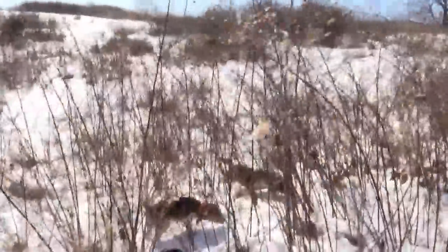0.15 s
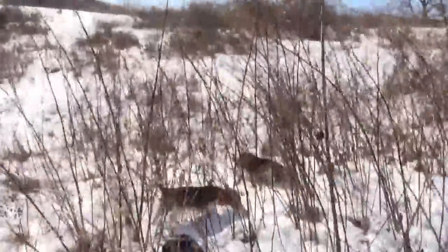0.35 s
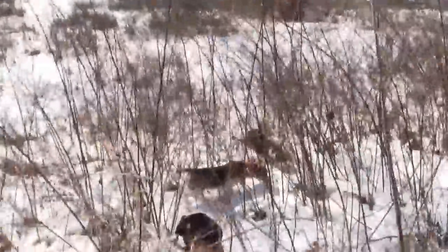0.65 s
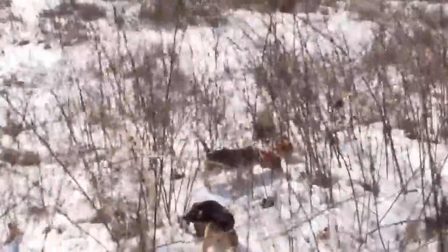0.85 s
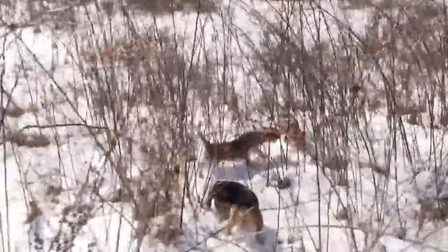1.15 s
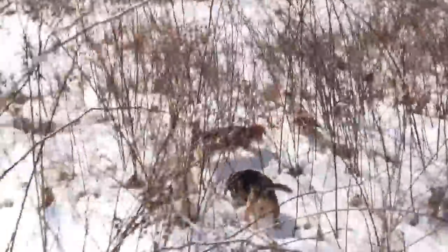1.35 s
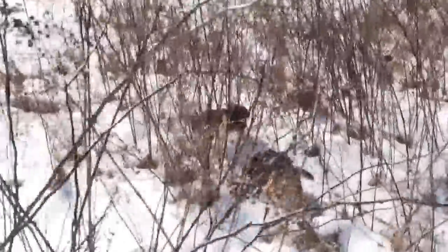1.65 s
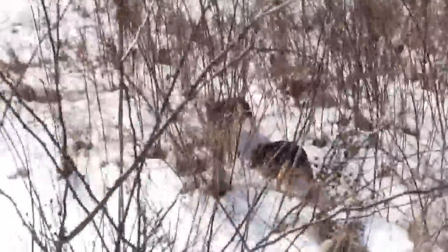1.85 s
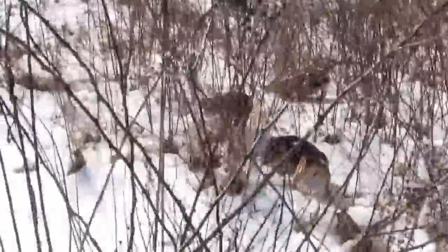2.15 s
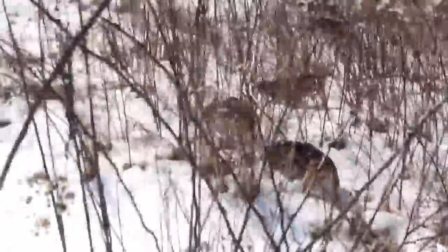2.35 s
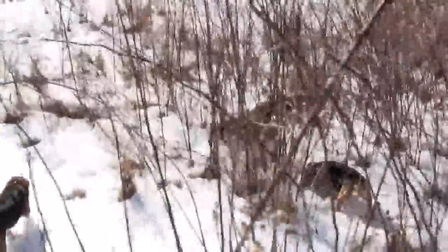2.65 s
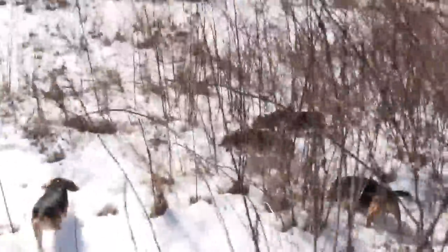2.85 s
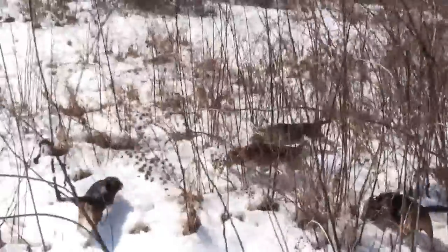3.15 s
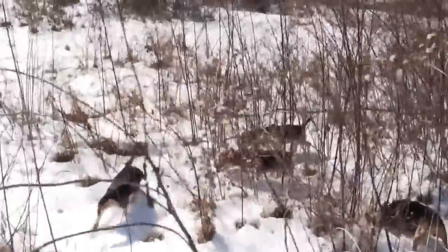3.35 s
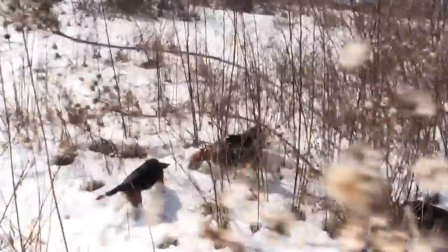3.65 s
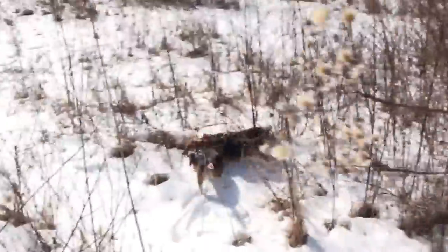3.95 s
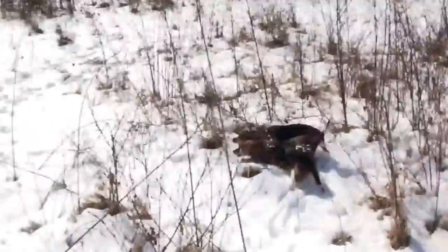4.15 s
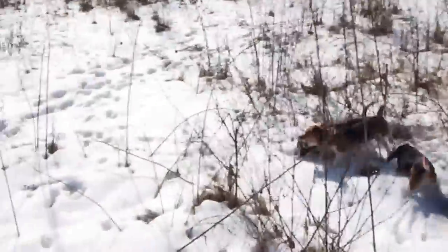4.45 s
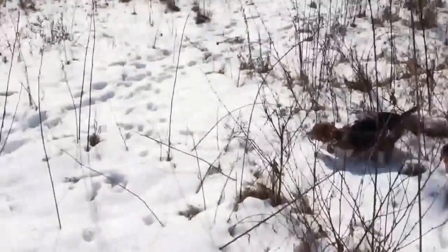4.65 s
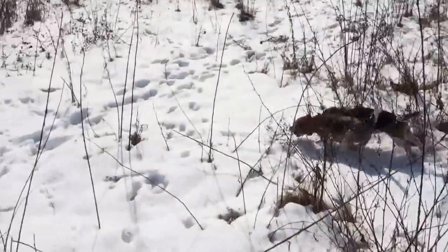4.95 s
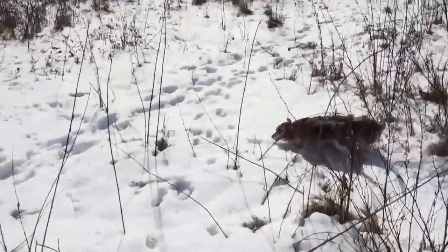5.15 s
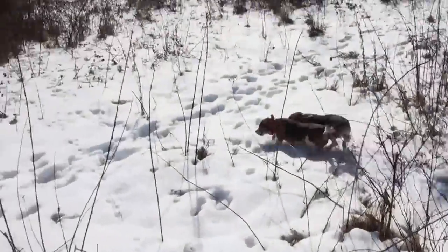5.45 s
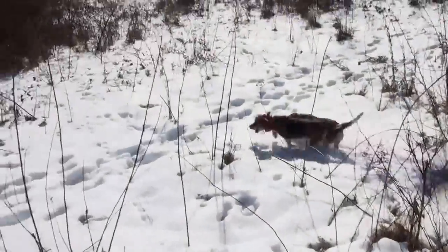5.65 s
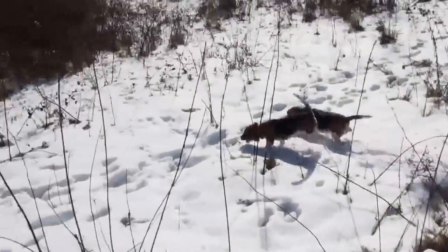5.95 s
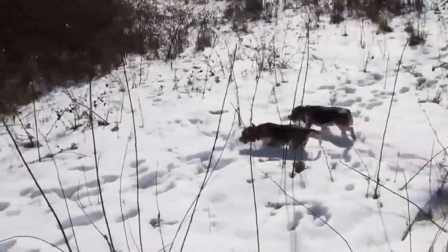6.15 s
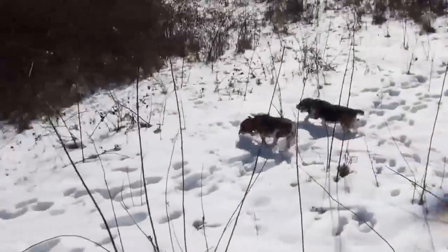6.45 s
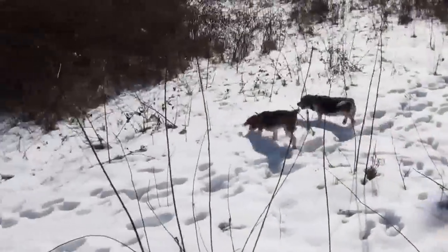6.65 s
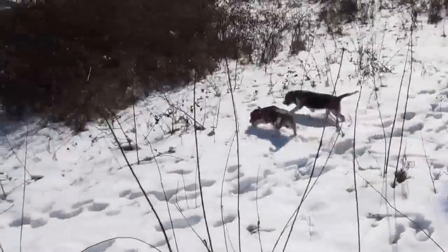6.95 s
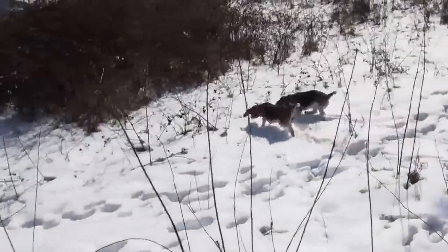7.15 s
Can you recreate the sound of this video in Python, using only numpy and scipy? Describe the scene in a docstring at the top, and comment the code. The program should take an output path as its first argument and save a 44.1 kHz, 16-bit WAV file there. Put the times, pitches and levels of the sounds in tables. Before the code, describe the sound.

Three hounds give tongue close to a handheld stereo microphone in open, nearly echoless snow. First only gusty rumble and crackling brush, then scattered bays with yelping voice breaks and gaps between them, then denser, rougher, overlapping cries. A soft low thud and small twig snaps slip in late, and the pack shifts gradually to the right.

```python
"""Wind rumbles on the microphone (shaped noise with gusts) while dry stems brush past (hiss and tiny cracks).
Twigs snap now and then (ringing noise bursts). After a second three hounds start to bay close by: one howls
long notes, then thin yelps break in (sliding tones), then come short chops and hoarse squalls, overlapping.
The baying voices are harmonics of vocal folds, roughened by a second oscillator and coloured by a throat.
One soft thud (a decaying sine) falls late in the scene, and the pack drifts to the right throughout."""
import sys
import numpy as np
from scipy import signal
from scipy.fft import rfft, irfft
from scipy.io import wavfile
from scipy.ndimage import uniform_filter1d, minimum_filter1d

SR = 44100
rng = np.random.default_rng(int(sys.argv[2]) if len(sys.argv) > 2 else 0)


def materialize(psi):
    """Save the field psi as 16-bit PCM at rate SR to the path in sys.argv[1].

    A 1-D psi becomes a single channel; in a 2-D psi each row is a channel.
    """
    bounded = np.clip(np.atleast_2d(psi).T, -1, 1)
    quanta = np.round(bounded * 32767).astype(np.int16)
    wavfile.write(sys.argv[1], SR, quanta)


N = 322371

# wind loudness over time, before gusts: t/s, relative level/dB
WIND_LEVEL = [(0, -38.5), (.65, -40.5), (.85, -32), (1.05, -31.5), (1.35, -45.5), (2.8, -43), (3.15, -51.5),
              (3.7, -45), (4.5, -36.5), (4.7, -59), (5.15, -54.5), (5.4, -65.5), (6.1, -55), (6.28, -44.5),
              (6.7, -54), (7.05, -59.5)]
# wind spectrum: f/Hz, relative level/dB
WIND_COLOUR = [(15, -41), (25, -6), (124, 0), (368, -10), (534, -15), (813, -20), (1200, -24.5),
               (1560, -24.5), (2640, -120)]
# how hard the brush scrapes over time: t/s, relative level/dB
BRUSH_PUSH = [(0, -47.5), (.18, -51.5), (.3, -41), (.7, -51.5), (1.15, -43.5), (1.45, -55), (2.7, -54),
              (3.7, -49.5), (4.8, -49), (5.7, -54), (6.65, -59.5), (6.72, -57), (7.05, -60)]
# brush spectrum: f/Hz, relative level/dB
BRUSH_COLOUR = [(400, 2.5), (2500, 0), (4000, -2.5), (7500, -5), (11500, -5), (15500, -17)]
# twig snaps: t/s, peak level before the mix/dB, centre f/Hz
SNAPS = [(0.119, -23, 1630), (2.013, -14.5, 10500), (5.478, -23, 6040), (6.708, -20.5, 7800)]
# one pitch curve for each howl, clear and mostly long: t/s, f/Hz
HOWL_PITCH = [
    [(1.197, 525), (1.211, 567.6), (1.249, 616.9), (1.339, 626), (1.383, 675), (1.415, 580)],
    [(2.68, 624), (2.706, 648), (2.776, 631), (2.804, 637), (2.816, 670), (2.84, 681.8)],
    [(5.533, 611), (5.561, 628.4), (5.609, 597.6), (5.649, 599), (5.681, 677), (5.692, 634)],
    [(5.915, 763), (5.929, 706.4), (5.937, 690), (5.961, 674), (5.979, 634), (5.998, 637)],
    [(6.02, 545), (6.044, 631.6), (6.166, 619), (6.214, 651.6), (6.336, 667.5), (6.375, 727)],
    [(6.775, 576), (6.799, 632), (6.821, 656.6), (6.921, 677), (6.931, 633), (6.945, 570)],
    [(7.252, 595), (7.272, 619.9), (7.298, 598), (7.31, 600)],
]
# tone of the same howls: level/dB, fundamental boost/dB, brightness/dB, top harmonics/dB,
# brightening over the note/dB, roughness/0-1, opening t/s, release t/s
HOWL_TONE = [(-20.5, -1.5, 3, -1.5, -2.5, 0.35, 0.043, 0.054), (-19.5, -3, -1.5, -7, -4, .02, 0.025, 0.029),
             (-20.5, -3, 3, -2, -5.5, 0.1, 0.017, 0.051), (-20.5, -4, -8, 14.5, -0.5, 0.13, 0.034, .02),
             (-22.5, -5.5, -2, -1.5, 10, 0, 0.06, 0.035), (-32.5, 11.5, 4, 4.5, -10, 0.36, 0.021, 0.031),
             (-21, -12, -5.5, 2.5, -9, .05, 0.018, 0.0017)]
# flips into the top register, or whistles: start t/s, end t/s, start f/Hz, end f/Hz, level/dB, overtone boost/dB
YELPS = [(1.394, 1.436, 6400, 6810, -36.5, -10), (1.588, 1.675, 980, 1350, -36.5, 13),
         (1.742, 1.771, 1580, 1410, -26, 1), (1.773, 1.804, 1070, 897, -19.5, 13.5),
         (2.37, 2.41, 1027, 955, -14.5, 6), (2.817, 2.831, 760, 830, -18, -3),
         (3.338, 3.39, 1350, 1297, -29.5, 18.5), (3.777, 3.814, 824, 1260, -32, 11),
         (4.135, 4.2, 964, 1140, -16, 3.5), (4.399, 4.49, 836, 1053, -17, 1),
         (4.806, 4.852, 720, 973, -32, 11), (5.29, 5.333, 923, 783, -13.5, 0.5),
         (5.379, 5.418, 746, 822, -19.5, -19), (5.823, 5.864, 1045, 865, -25, 10),
         (5.991, 6.098, 674, 718, -19.5, 10), (6.305, 6.336, 1002, 807, -18, 9),
         (6.786, 6.815, 968, 938, -14.5, 8)]
# short barks: start t/s, length t/s, opening t/s, pitch f/Hz, scoop from below/share, glide over the note/share,
# level/dB, fundamental boost/dB, brightness/dB, top harmonics/dB, roughness of the attack/0-1
CHOPS = [(1.656, 0.11, 0.026, 580, 0.017, 0.035, -23.5, 2, -4.5, 2, 0.97),
         (2.837, 0.11, 0.027, 600.7, 0.0073, 0.029, -16.5, -1, -1, 3.5, 0.43),
         (3.366, 0.1, 0.04, 617, 0.072, -0.0027, -23, 5, 3, -3, 0.46),
         (3.809, 0.13, .026, 612.5, .14, 0.045, -21, -0.5, -1, 4, 0.64),
         (5.003, 0.14, .054, 619.5, 0.24, -0.059, -21.5, 0.5, 0.5, 0.5, 0.78)]
# hoarse cries: start t/s, length t/s, release t/s, pitch f/Hz, scoop from below/share, glide over the note/share,
# second oscillator f/Hz, level/dB, fundamental boost/dB, brightness/dB, top harmonics/dB, darkening/dB,
# roughness at first/0-1, roughness at last/0-1
SQUALLS = [(1.795, 0.12, 0.036, 585, 0.0206, -0.037, 788.6, -20.5, -4.5, 5.5, -3, 11, 0.51, 0.73),
           (2.405, 0.074, 0.018, 577.4, 0, 0.066, 1020, -16, -4, -5.5, 4, 6, 0.43, 0.017),
           (4.197, 0.065, 0.036, 632, 0.002, -0.053, 1029, -16.5, -6.5, 5, -2, 7, 0.35, 0.72),
           (4.403, 0.13, 0.0162, 529, .14, 0.22, 898, -25, 7.5, -5.5, 11, 10, 0.39, 1),
           (4.841, 0.12, 0.051, 589, 0.028, 0.12, 857, -17.5, -8, -1, -9, 7, 0.796, 0.36),
           (5.322, 0.078, 0.016, 549, 0.066, -.06, 805, -16.5, -2, -11, -3, -2, 0.39, 0.72),
           (5.599, 0.12, .028, 566, 0.062, 0.052, 830, -19.5, -1.5, 0.5, -0.5, 8, 0.56, 0.033),
           (5.849, 0.091, 0.02, 582.7, 0.045, 0.0033, 840, -13, -9, -6, -9, 20.5, 0.75, 0.022),
           (5.985, .19, 0.0247, 553.6, 0.028, 0.19, 795, -24, -13, -0.5, -1, -5, 0.31, 0.1),
           (6.334, 0.098, 0.04, 572.5, 0.0023, -0.0024, 791, -14.5, -12, -11.5, 2.5, -3, 0.27, 0.17),
           (6.812, 0.095, 0.038, 584, 0.03, -0.026, 861, -21, -16, -3, -16, -3, 0.79, 0.71)]
# throat resonances: f/Hz, howler level/dB, chopper level/dB, squaller level/dB
THROATS = [(362, -15.5, -35, -40.5), (585, 0, -3, -2.5), (1197, 2.5, 4.5, -1), (1670, -4.5, -1, -11),
           (2484, -4, -5.5, -13.5), (2936, -9, -18.5, -20.5), (3530, -23, -20, -29.5),
           (4120, -35.5, -32, -27.5), (5030, -32.5, -25, -30), (6170, -32, -31.5, -37),
           (7700, -45, -51, -55), (9700, -42, -35, -41), (14000, -68, -46, -69)]
# lead of the left microphone port over the right: f/Hz, phase/rad
PORT_PHASE = [(260, 1), (650, 0.86), (3100, 0.63), (8000, .05)]

# tone changes at the ends of a cry, as (level, fundamental, brightness, top harmonics) in dB
HOWL_OPEN_DB, HOWL_CLOSE_DB = (-13, -5, 5, 12), (-33, 11, -2, -6)
CHOP_OPEN_DB, CHOP_CLOSE_DB = (-9, 5.5, 9.5, 7), (-22.5, 15.5, -6, 10)
SQUALL_OPEN_DB, SQUALL_CLOSE_DB = (-3.5, 3.5, 0.5, 2), (-10, -8, -7.5, 7)


def amp(db):
    """Turns decibels into gain."""
    return 10 ** (np.asarray(db) / 20)


def unit(x):
    """Scales to rms 1."""
    return x / np.sqrt(np.mean(x ** 2))


def read(points, hz):
    """Reads a spectrum on a log-frequency axis."""
    f, value = np.transpose(points)
    return np.interp(np.log(hz + 1), np.log(f), value)


def coloured(x, points):
    """Filters by a spectrum, without shifting phase."""
    gain = amp(read(points, np.fft.rfftfreq(N, 1 / SR)))
    return irfft(rfft(x) * gain, N)


def wander(size, hz):
    """Smooth random drift of about rms 1: noise that falls away above hz."""
    f = np.fft.rfftfreq(size + SR, 1 / SR)
    spectrum = rfft(rng.standard_normal(size + SR)) / (1 + (f / hz) ** 4)
    return unit(irfft(spectrum))[:size]


def add(mix, start_s, sound):
    """Mixes a sound in at its start time."""
    part = mix[round(start_s * SR):][:len(sound)]
    part += sound[:len(part)]


def at_ports(common, side, apart):
    """Spreads noise over two ports: the side part enters them with opposite signs."""
    return unit(common) + apart * unit(side) * np.array([[1], [-1]])


def wind(gust_db=3.5, apart=0.72):
    """Lumpy rumble: low noise under random gusts, partly different at the two ports."""
    common, side = coloured(rng.standard_normal((2, N)), WIND_COLOUR)
    level_db = np.interp(np.arange(N) / SR, *np.transpose(WIND_LEVEL))
    level_db = level_db + gust_db * wander(N, 14)
    return amp(level_db) * at_ports(common, side, apart)


def brush(level_db=4, scrape_db=2, grains_per_s=500, grain_db=7, apart=.35):
    """Dry stems and snow crust scrape unevenly: hiss with tiny cracks in it."""
    crack_happens = rng.random(N) < grains_per_s / SR
    # crack sizes vary, mostly small
    crack_db = grain_db + 2.9 * np.minimum(rng.exponential(1, N), 4)
    grainy = rng.standard_normal((2, N)) * (1 + crack_happens * amp(crack_db))
    common, side = coloured(grainy, BRUSH_COLOUR)
    push_db = np.interp(np.arange(N) / SR, *np.transpose(BRUSH_PUSH))
    push_db = push_db + scrape_db * wander(N, 22.4)
    return amp(level_db + push_db) * at_ports(common, side, apart)


def snaps(crack_s=.0005, splinter_s=0.022, splinter_db=-21):
    """Twigs crack and splinter: a fast and a slow decay of noise through one broad resonance."""
    mix, t = np.zeros(N), np.arange(SR // 20) / SR
    for start_s, peak_db, centre_hz in SNAPS:
        decay = np.exp(-t / crack_s) + amp(splinter_db) * np.exp(-t / splinter_s)
        burst = rng.standard_normal(len(t)) * decay
        snap = signal.lfilter(*signal.iirpeak(centre_hz, 2, fs=SR), burst)
        add(mix, start_s, amp(peak_db) * snap / abs(snap).max())
    return mix


def phase_of(hz):
    """Running phase of a pitch curve."""
    return 2 * np.pi * np.cumsum(hz) / SR


def gate(t, edge_s=0.0063):
    """The voice catches and stops smoothly, by default within a few cycles."""
    from_edge_s = np.minimum(t - t[0], t[-1] - t)
    return np.sin(np.pi / 2 * np.clip(from_edge_s / edge_s, 0, 1)) ** 2


def span(start_s, end_s):
    """Sample times of a cry, with room for the voice to catch and stop."""
    return np.arange(start_s - .003, end_s + .003, 1 / SR)


def stages(t, open_s, close_s):
    """Three ramps: the opening (1 to 0), progress through the held note (-.5 to .5), the closing (0 to 1)."""
    release = t[-1] - close_s
    opening = np.interp(t, [t[0], t[0] + open_s], [1, 0])
    held = np.interp(t, [t[0], release], [-.5, .5])
    closing = np.interp(t, [release, t[-1]], [0, 1])
    return opening, held, closing


JITTER, CHAOS = .002, .08  # pitch unrest when clear, and added when hoarse (shares)
COUPLING, SWING = .65, .1  # depth of the beat in level (share) and in phase (radians)


def cry(t, hz, level_db, chest_db, bright_db, top_db, rough, second_hz, second_db, rasp, breathy):
    """Harmonics of the vocal folds; when hoarse, a second oscillator beats against them and upsets the pitch."""
    rough = np.clip(rough, 0, 1)
    unrest = JITTER + CHAOS * rough ** 3
    folds = phase_of(hz * (1 + unrest * wander(len(t), 130)))
    second = phase_of(second_hz * (1 + unrest * wander(len(t), 72)))
    # the beat puts sidebands between the harmonics
    beat = rough * np.cos(second - folds)
    folds = folds + SWING * beat
    # four strong harmonics carry the cry; those above swell unevenly and fray with fast jitter
    uneven_db = np.linspace(*rng.normal(-6, 5, (2, 17)), len(t)).T
    frayed = folds + .06 * (1 + 2 * rough) * wander(len(t), hz.mean() / 2)
    top = sum(amp(db) * np.cos(k * frayed) for k, db in enumerate(uneven_db, 5))
    upper = np.cos(3 * folds) + np.cos(4 * folds)
    # air hisses through the folds each time they open
    air = (breathy + rasp * rough ** 2) * (1 + np.cos(folds)) * rng.standard_normal(len(t))
    edge = amp(bright_db) * (upper + amp(top_db) * (top + air))
    voice = amp(chest_db) * np.cos(folds) + np.cos(2 * folds) + edge
    voice = voice * (1 + COUPLING * beat) + amp(second_db) * rough * np.cos(second)
    return t[0], amp(level_db) * voice * gate(t)


def howl(pitch, level_db, chest_db, bright_db, top_db, brighten_db, rough, open_s, release_s):
    """A note that opens pinched and bright, is roughest in the middle and dies away."""
    s, hz = np.transpose(pitch)
    t = span(s[0], s[-1])
    opening, held, closing = stages(t, open_s, release_s)
    tone_db = np.outer(opening, HOWL_OPEN_DB) + np.outer(closing ** 2, HOWL_CLOSE_DB)
    tone_db = tone_db + np.outer(held, [0, 0, brighten_db, 0])
    tone_db = tone_db + [level_db, chest_db, bright_db, top_db]
    return cry(t, np.interp(t, s, hz), *tone_db.T, rough * np.cos(np.pi * held),
               second_hz=789, second_db=2.0, rasp=2.9, breathy=0.19)


def yelp(start_s, end_s, start_hz, end_hz, level_db, boost_db, overtones_db=(-22, -38), swell_s=0.0025):
    """A near-pure tone that slides quickly, then settles; weak ones swell more slowly."""
    t = np.arange(start_s, end_s, 1 / SR)
    hz = end_hz + (start_hz - end_hz) * np.linspace(1, 0, len(t)) ** 2
    phase = phase_of(hz * (1 + 2 * JITTER * wander(len(t), 300)))
    overtones = sum(amp(boost_db + db) * np.cos(k * phase) for k, db in enumerate(overtones_db, 2))
    tone = np.cos(phase) + overtones
    return start_s, amp(level_db) * tone * gate(t, swell_s / amp(level_db / 2))


def chop(start_s, length_s, open_s, pitch_hz, scoop, glide, level_db, chest_db, bright_db, top_db, rough,
         shut_rough=0.63, close_s=0.031, drop=0.2):
    """A short bark: a rasping scoop up to a clear note, which drops and roughens as the mouth shuts."""
    t = span(start_s, start_s + length_s)
    opening, held, closing = stages(t, open_s, close_s)
    hz = pitch_hz * (1 - scoop * opening ** 2 + glide * held)
    hz = hz * (1 - drop * closing ** 2)
    tone_db = np.outer(opening, CHOP_OPEN_DB) + np.outer(closing ** 2, CHOP_CLOSE_DB)
    tone_db = tone_db + [level_db, chest_db, bright_db, top_db]
    return cry(t, hz, *tone_db.T, rough * opening + shut_rough * closing,
               second_hz=816.6, second_db=-4.5, rasp=1.8, breathy=0.23)


def squall(start_s, length_s, release_s, pitch_hz, scoop, glide, second_hz, level_db, chest_db, bright_db,
           top_db, darken_db, rough_first, rough_last, open_s=0.0287, drop_per_s=11, drop_curve=1.79):
    """A hoarse cry that swells in, mostly darkens, and loses pitch in the release, more if it is long."""
    t = span(start_s, start_s + length_s)
    opening, held, closing = stages(t, open_s, release_s)
    hz = pitch_hz * (1 - scoop * opening ** 2 + glide * held)
    hz = hz * (1 - drop_per_s * release_s * closing ** drop_curve)
    # the fundamental thins over the held note
    tone_db = np.outer(held, [0, -5.5, -darken_db, 0]) + [level_db, chest_db, bright_db, top_db]
    tone_db = tone_db + np.outer(opening, SQUALL_OPEN_DB) + np.outer(closing ** 2, SQUALL_CLOSE_DB)
    rough = np.interp(held, [-.5, .5], [rough_first, rough_last])
    return cry(t, hz, *tone_db.T, rough, second_hz=second_hz, second_db=-3.5, rasp=1.85, breathy=0.88)


def resonant(x, points, size=2048):
    """A causal minimum-phase filter with the given spectrum, so that its peaks ring briefly."""
    log_gain = np.log(amp(read(points, abs(np.fft.fftfreq(size, 1 / SR)))))
    response = np.fft.ifft(np.exp(np.conj(signal.hilbert(log_gain)))).real
    return signal.oaconvolve(x, response)[:N]


def hounds():
    """Howler, chopper and squaller each cry through their own throat; yelps are added as plain tones."""
    mix, throats = np.zeros(N), np.array(THROATS)
    howler = [howl(pitch, *tone) for pitch, tone in zip(HOWL_PITCH, HOWL_TONE)]
    chopper = [chop(*row) for row in CHOPS]
    squaller = [squall(*row) for row in SQUALLS]
    for column, cries in enumerate([howler, chopper, squaller], 1):
        folds = np.zeros(N)
        for start_s, sound in cries:
            add(folds, start_s, sound)
        mix += resonant(folds, throats[:, [0, column]])
    for row in YELPS:
        add(mix, *yelp(*row))
    return mix


def thud(start_s=5.268, hz=227, level_db=-18.5, rise_s=0.0017):
    """One soft thud: a low sine under a quick rise and decay."""
    mix, t = np.zeros(N), np.arange(SR // 20) / SR
    envelope = t / rise_s * np.exp(1 - t / rise_s)
    add(mix, start_s, -amp(level_db) * envelope * np.sin(2 * np.pi * hz * t))
    return mix


def thicket(x, t60_s=0.4, wet_db=-29):
    """Snow swallows the sound; only the stems scatter a little back, as a faint decaying noise tail."""
    t = np.arange(SR // 2) / SR
    tail = rng.standard_normal(len(t)) * amp(-60 * t / t60_s)
    return x + amp(wet_db) * signal.fftconvolve(x, tail / np.linalg.norm(tail))[:N]


def scene(pack_db=2.0, drift_db=4.5):
    """The pack drifts to the right of a pair of microphone ports, by level, amid wind and brush."""
    pack = thicket(amp(pack_db) * hounds() + snaps() + thud())
    # each side takes half of the drift
    pan = amp(-drift_db * np.linspace(0, 1, N) ** 2 / 2)
    lead = np.exp(1j * read(PORT_PHASE, np.fft.rfftfreq(N, 1 / SR)))
    left = irfft(rfft(pack) * lead, N)
    return np.array([left * pan, pack / pan]) + wind() + brush()


def record(dry, ceiling_db=-9.0, recovery_db_per_s=110, edge_hz=15900):
    """A quick limiter flattens the cries and ducks the background with them; then a low-pass trims the top."""
    peak_db = 20 * np.log10(abs(dry).max(0) + 1e-9)
    # held peaks sink at the recovery rate
    fall_db = np.arange(N) * recovery_db_per_s / SR
    held_db = np.maximum.accumulate(peak_db + fall_db) - fall_db
    over_db = np.maximum(held_db - ceiling_db, 0)
    gain_db = uniform_filter1d(minimum_filter1d(-over_db, size=90), size=90)
    low_pass = signal.firwin(511, edge_hz, window=("kaiser", 9), fs=SR)
    return signal.oaconvolve(dry * amp(gain_db), low_pass[None], "same")


dry = scene()
out = record(dry)
materialize(out)
```